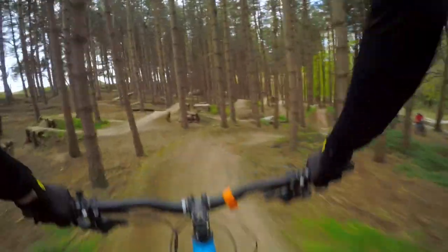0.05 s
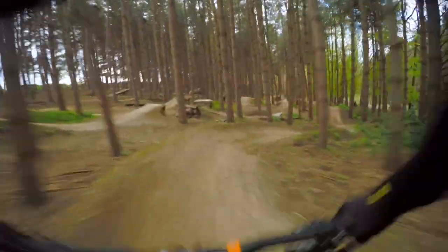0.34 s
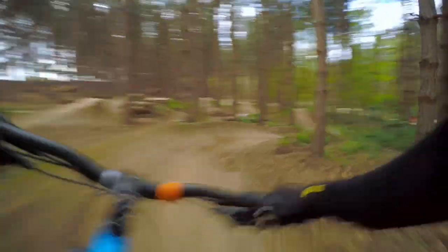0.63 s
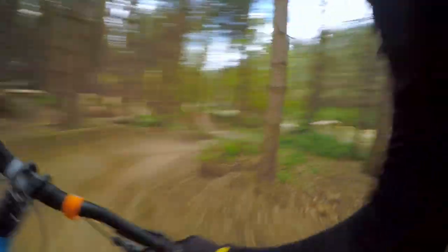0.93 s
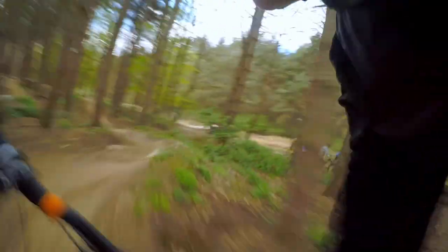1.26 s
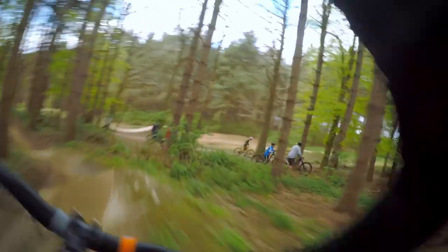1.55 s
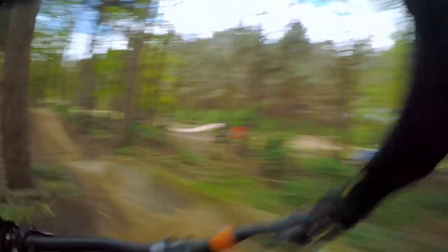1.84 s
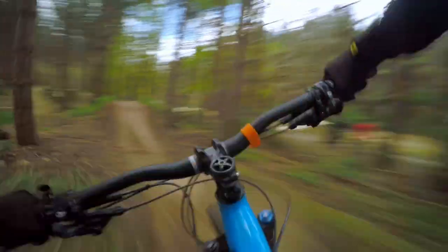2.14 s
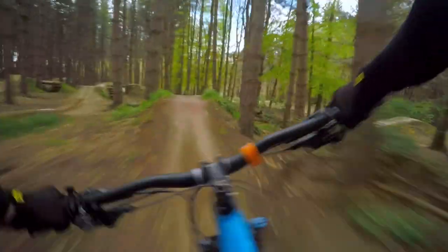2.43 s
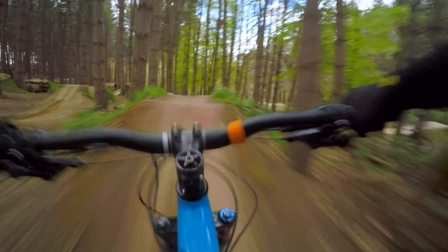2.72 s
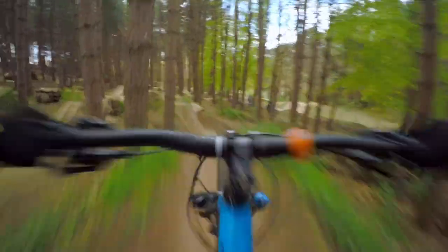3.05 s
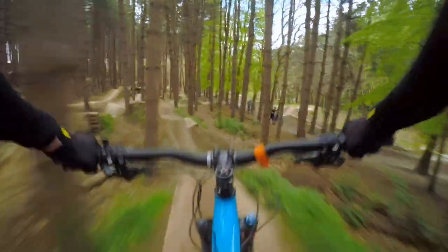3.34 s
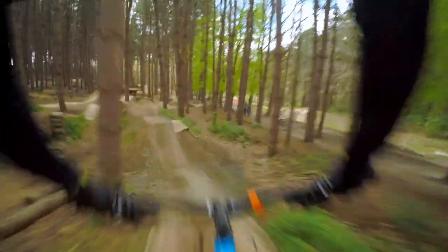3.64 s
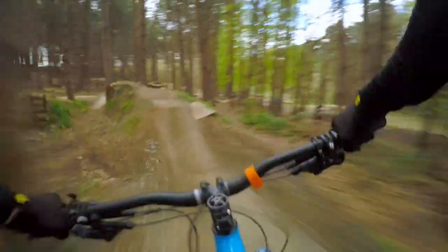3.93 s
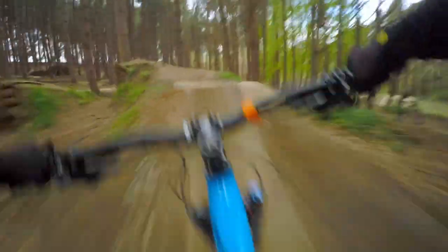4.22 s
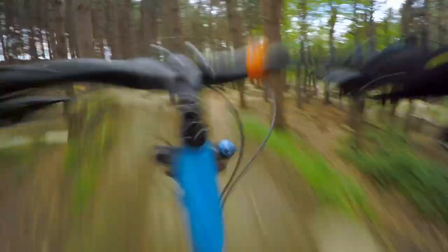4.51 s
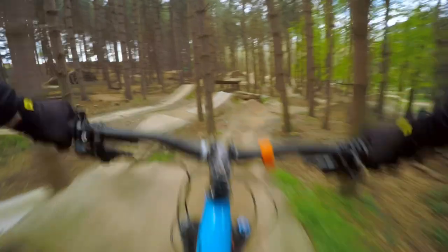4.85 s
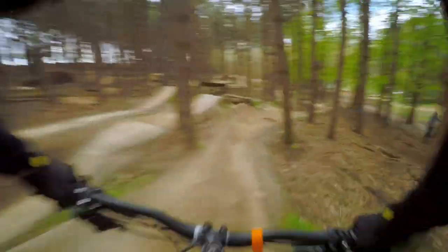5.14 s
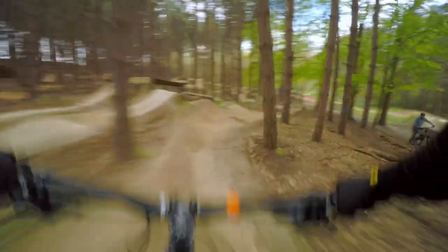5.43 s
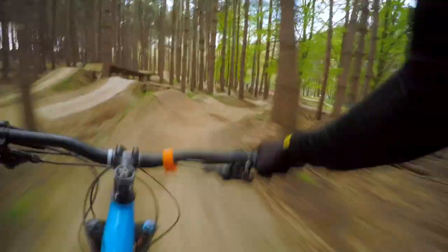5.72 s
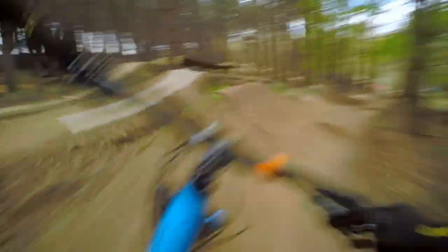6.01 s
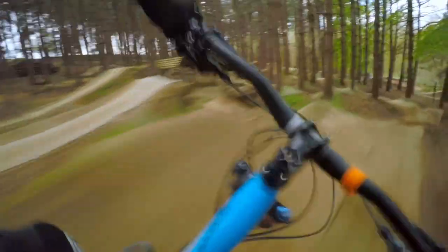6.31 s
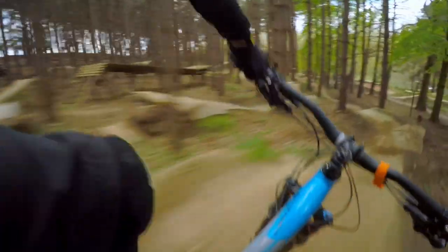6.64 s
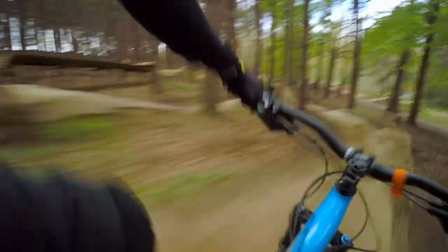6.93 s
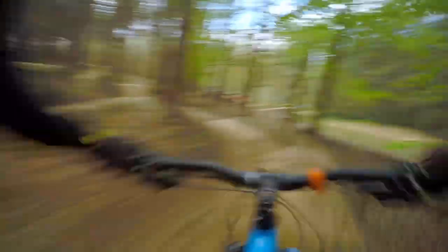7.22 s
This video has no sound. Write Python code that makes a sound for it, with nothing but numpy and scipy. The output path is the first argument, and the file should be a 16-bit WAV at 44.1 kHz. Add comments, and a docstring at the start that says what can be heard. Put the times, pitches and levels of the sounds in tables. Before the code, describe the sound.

Low wind rumbles and thumps on a chest-worn microphone as a mountain bike speeds along a woodland dirt trail. Gritty tyre crunch and hum drop away at each jump, where the freewheel ticks faintly, then return with a jolt on landing. Stones snap against the frame, the chain clatters and metal occasionally pings. Midway the rear tyre skids amid hard knocks, before more jumps and stronger gusts.

```python
"""Mountain bike on a dirt jump trail

Heard from the rider's chest in a wood, the tyres crunch and hum while they touch the ground, skid
once and flick stones at the frame. Landings and jolts excite the damped modes of chain and frame.
In the air the tyre sounds die away, leaving the ticking freewheel and a thin hiss.
Turbulent wind buffets the microphone throughout."""
import sys
import numpy as np
from scipy import signal
from scipy.fft import rfft, irfft, next_fast_len
from scipy.io import wavfile
from scipy.ndimage import uniform_filter1d, map_coordinates

SR = 44100
rng = np.random.default_rng(int(sys.argv[2]) if len(sys.argv) > 2 else 0)


def inscribe(sig):
    """Save sig as 16-bit PCM at rate SR to the path in sys.argv[1].

    A 1-D sig is mono; a 2-D sig holds one channel per row.
    Samples are clipped to [-1, 1] before scaling.
    """
    pcm = np.round(np.clip(np.atleast_2d(sig).T, -1, 1) * 32767)
    wavfile.write(sys.argv[1], SR, pcm.astype(np.int16))


N = 320607
TIME = np.arange(N) / SR
CUTOFF_HZ = 15300


def from_db(db):
    """Amplitude ratio of a level in decibels."""
    return 10 ** (np.asarray(db) / 20)


def rms_one(x):
    """Normalisation to unit rms."""
    return x / np.sqrt(np.mean(x ** 2) + 1e-20)


def in_time(rows):
    """Linear interpolation of (time [s], value) rows at every sample."""
    return np.interp(TIME, *np.transpose(rows))


def swells(rows):
    """Sum of Gaussian envelopes, given as (time [s], level [dB], half length [s])."""
    return sum(from_db(db) * np.exp(-((TIME - s) / half) ** 2) for s, db, half in rows)


def decay(t, t60):
    """Exponential damping: the amplitude falls 60 dB in t60 seconds."""
    return np.exp(-np.log(1000) * t / t60)


def add(track, s, sound):
    """Superposition of a short sound on a track at time s."""
    start = max(int(s * SR), 0)
    track[start:start + len(sound)] += sound[:max(N - start, 0)]


def drift(per_s):
    """Smooth random modulation through per_s values a second; rms 1."""
    knots = rng.standard_normal(N // 20)
    return rms_one(map_coordinates(knots, [TIME * per_s + 10], order=2))


def rough_tone(phase, width_hz):
    """Narrow-band noise: two carriers in quadrature, each randomly modulated."""
    return drift(width_hz) * np.cos(phase) + drift(width_hz) * np.sin(phase)


def coloured(x, spectrum):
    """Minimum-phase filtering by a (frequency [Hz], level [dB]) curve; rms 1."""
    size = next_fast_len(N + SR, real=True)
    hz, db = np.transpose(spectrum)
    log_f = np.log(np.arange(size // 2 + 1) * SR / size + 1)
    edges = np.log(np.r_[hz[0] / 2, hz, hz[-1] * 2])
    response_db = np.interp(log_f, edges, np.r_[db[0] - 20, db, db[-1] - 20])
    cepstrum = irfft(np.log(from_db(response_db)), size)
    cepstrum[1:size // 2] *= 2   # folding the cepstrum makes the filter causal
    cepstrum[size // 2 + 1:] = 0
    return rms_one(irfft(rfft(x, size) * np.exp(rfft(cepstrum)), size)[:N])


def noise(spectrum, envelope=1):
    """Source and filter: white noise under an envelope, shaped by a spectrum; rms 1."""
    return coloured(rng.standard_normal(N) * envelope, spectrum)


def steadied(x, span_s):
    """Division by the running rms: slow power changes go, faster fluctuations stay."""
    size = max(int(span_s * SR), 2)
    return x / np.sqrt(uniform_filter1d(uniform_filter1d(x * x, size), size) + 1e-9)


# wind strength, growing with speed: (time [s], relative level [dB])
WIND_STRENGTH = [(0, 0), (.05, 5), (.22, -5.5), (.39, 3), (.44, -9), (.6, -4.5), (.74, 3), (1.05, 0),
                 (1.3, -5), (1.95, -1), (2.35, 1), (3.0, -1.5), (3.9, -1), (4.1, 1.5), (5.7, 0), (6.6, 2),
                 (7.27, 2)]
# gusts: (time [s], roar level [dB], half length [s])
GUSTS = [(.08, -28, 0.06), (.79, -21.5, 0.11), (2.625, -10.5, 0.031), (2.78, -21, 0.075),
         (3.18, -22, 0.057), (4.05, -27.5, 0.035), (4.63, -17.5, .07), (4.87, -22.5, 0.094),
         (5.23, -25, 0.064), (5.9, -18, 0.07), (6.14, -21, .04), (6.29, -20.5, 0.064), (6.5, -19.5, 0.031),
         (6.7, -17.5, 0.03), (7.0, -18.5, 0.031)]
# spectra of the eddies, the roar and a gust's thump: (frequency [Hz], relative level [dB])
EDDY_SPECTRUM = [(8, -20.5), (18, 5.5), (30, 2), (50, 0.5), (80, -9), (130, -23), (300, -56.5)]
ROAR_SPECTRUM = [(45, -14.5), (90, 0), (130, -3.5), (200, -10.5), (300, -17.5), (500, -27.5), (1000, -42),
                 (3000, -64.5)]
THUMP_SPECTRUM = [(30, -19), (55, 3.5), (75, 3), (110, -1), (170, -36), (600, -64)]

def wind(flutter_db, lumpy_db):
    """Turbulent pressure: large eddies buffet the microphone; gusts add a thump and fluttering roar."""
    flow = from_db(in_time(WIND_STRENGTH) + lumpy_db * drift(20))
    gusts = swells(GUSTS)
    eddies = steadied(noise(EDDY_SPECTRUM), 0.085)
    roar = steadied(noise(ROAR_SPECTRUM, from_db(flutter_db * drift(60))), 0.07)
    thump = steadied(noise(THUMP_SPECTRUM), 0.05)
    roar_gain = np.hypot(from_db(-29.5) * flow, gusts)
    return from_db(-16) * flow * eddies + roar_gain * roar + from_db(1.5) * gusts * thump


# spectrum of a pawl click: (frequency [Hz], relative level [dB])
PAWL_SPECTRUM = [(1200, 0), (2800, 10), (4200, -4), (6500, 1.5), (9000, -8), (14500, -4)]

def freewheel(clicks_per_s, decay_s):
    """Periodic impacts: the pawls drop over each tooth of the hub."""
    since_click = TIME % (1 / clicks_per_s)
    clicks = np.exp(-since_click / decay_s) * from_db(1.8 * drift(45))
    return from_db(-50.5) * noise(PAWL_SPECTRUM, clicks)


# hiss of the air: (time [s], level [dB])
HISS_LEVEL = [(0, -48), (3.4, -43), (4.9, -46), (7.27, -44)]
# its spectrum: (frequency [Hz], relative level [dB])
HISS_SPECTRUM = [(300, 10), (600, 6), (1100, -1.5), (1900, -4), (2300, -2.5), (2750, 3.5), (3300, -1),
                 (4200, -0.5), (5200, -8.5), (6800, -10), (9000, -13.5), (15000, -18.5)]

def air_hiss():
    """Flow noise: air streams past the spokes."""
    return from_db(in_time(HISS_LEVEL)) * noise(HISS_SPECTRUM)


# short tyre growls and hums: (time [s], pitch [Hz], level [dB], half length [s])
BRIEF_HUMS = [(0.243, 556, -49, 0.034), (2.838, 420, -37, 0.061), (2.929, 409.6, -27, 0.015),
              (2.999, 458, -32.5, 0.018), (3.144, 610, -40, 0.031)]

def brief_hums():
    """Random phase modulation: short tyre growls and hums waver, pitched above the tread hum."""
    return sum(np.sqrt(2) * swells([(s, db, half)]) * np.sin(2 * np.pi * hz * TIME + 0.5 * drift(33))
               for s, hz, db, half in BRIEF_HUMS)


# knocks of chain and frame: (time [s], relative level [dB], centre frequency [Hz])
KNOCKS = [(0.317, -25, 1520), (0.364, -17, 2900), (1.815, -25, 2105), (1.854, -23, 3490),
          (1.916, -26.5, 1470), (2.11, -14.5, 1580), (2.129, -20, 2410), (2.163, -23.5, 1670),
          (2.281, -20, 1060), (2.672, -15, 3460), (3.03, -22, 1600), (3.461, -28, 1360), (3.531, -24, 880),
          (3.731, -19, 1480), (3.878, -26, 2220), (4.012, -15.5, 1580), (4.136, -11.5, 1704),
          (4.195, -7.5, 2560), (4.213, -15, 3000), (4.251, -10.5, 2150), (5.151, -26.5, 3770),
          (5.328, -25.5, 2520), (5.370, -26, 2980), (5.388, -17.5, 1643), (5.905, -19, 1260),
          (6.041, -13.5, 2880), (6.358, -17, 1310), (6.829, -16.5, 1800), (6.865, -16.5, 2500),
          (6.903, -16.5, 2750), (6.955, -20.5, 1315), (7.223, -16, 1570)]

def knocks(level_db, log_spread, rattle, mode_count, t60):
    """Impact excitation: a cluster of damped modes, and a rattle that dies with them."""
    out, t = np.zeros(N), TIME[:SR // 6]
    for s, db, hz in KNOCKS:
        detune, phase = rng.random((2, mode_count, 1))
        offset = 2 * (np.arange(mode_count)[:, None] + detune) / mode_count - 1   # -1 to 1
        mode_hz = hz * np.exp(log_spread * offset)
        modes = np.cos(offset * np.pi / 2) * np.sin(2 * np.pi * (mode_hz * t + phase))
        band = signal.butter(2, [hz / 2, min(hz * 2, CUTOFF_HZ)], "band", fs=SR, output="sos")
        chatter = signal.sosfilt(band, rng.standard_normal(len(t)))
        clack = rms_one(rms_one(modes.sum(0)) + rattle * rms_one(chatter))
        add(out, s, from_db(db + level_db) * clack * decay(t, t60))
    return out


# wheel and frame resonances: (frequency [Hz], bandwidth [Hz], gain [dB])
FRAME_MODES = [(790, 25, -4.5), (1210, 37, -9), (1670, 80, -9.5), (1940, 51, -25), (2750, 190, -13.5),
               (3220, 330, -25)]

def frame(shaking):
    """Forced vibration: wheels and frame add their resonances to whatever shakes them."""
    out = shaking
    for hz, width_hz, db in FRAME_MODES:
        r = np.exp(-np.pi * width_hz / SR)
        poles = [1, -2 * r * np.cos(2 * np.pi * hz / SR), r * r]
        out = out + from_db(db) * (1 - r * r) / 2 * signal.lfilter([1, 0, -1], poles, shaking)
    return out


# tyre bite, one curve per stretch from touchdown to lift: (time [s], level re ordinary rolling [dB])
BITE = [
    [(0.319, -0.5), (0.41, 2.5), (0.6, 0), (1.15, -2), (1.3, 3), (1.5, -2.5), (1.78, -15)],
    [(1.82, -7), (2.05, -3), (2.25, -1.5), (2.5, -6.5), (2.7, 1.5), (3.03, -5), (3.11, -13), (3.24, -14)],
    [(3.735, -0.5), (3.8, 2.5), (3.87, -10), (3.99, -6.5), (4.035, 2.5), (4.245, 17.5), (4.32, 7.5),
     (4.46, -0.5), (4.82, -11)],
    [(5.27, -10.5), (5.36, -8), (5.39, 0.5), (5.58, 3.5), (5.88, -2.5), (6.08, 4), (6.27, 0.5), (6.37, 4),
     (6.72, -16.5)],
    [(6.83, 3.5), (6.92, 3.5), (7.04, -0.5), (7.11, 4.5), (7.2, 0), (7.27, 6.5)],
]

def contact(touch_s, lift_s):
    """Contact loading: the bite's gain ramps up at touchdown and decays as the wheels lift."""
    bite = 0
    for stretch in BITE:
        touchdown, lift = stretch[0][0], stretch[-1][0]
        onset = np.clip((TIME - touchdown) / touch_s + 1, 0, 1)
        release = np.exp(-np.maximum(TIME - lift, 0) / lift_s)
        bite = bite + onset * release * from_db(in_time(stretch))
    return bite


def landings(decay_s):
    """Impact transients: a decaying jolt at each touchdown, as strong as the first bite."""
    touchdowns = [stretch[0] for stretch in BITE]
    return sum(from_db(db) * (TIME >= s) * np.exp(-np.abs(TIME - s) / decay_s) for s, db in touchdowns)


def fractures(per_s, spread_db, decay_s):
    """Shot noise: the power of random fractures, each sudden and dying quickly; mean 1."""
    sizes = from_db(spread_db * np.minimum(rng.exponential(1, N), 5))
    impulses = (rng.random(N) < per_s / SR) * sizes ** 2
    power = signal.lfilter([1], [1, -np.exp(-1 / (decay_s * SR))], impulses + 1e-12)
    return power / power.mean()


def crushed_dirt(per_s, spread_db, decay_s, clod_share, patchy_db):
    """Granular fracture: clods break across all bands at once, single grains each in one band."""
    out, clods = 0, fractures(per_s, spread_db, decay_s)
    edges_hz = np.geomspace(350, 17000, 11)
    for low, high in zip(edges_hz, edges_hz[1:]):
        band = signal.butter(2, [low, high], "band", fs=SR, output="sos")
        hiss = signal.sosfilt(band, rng.standard_normal(N))
        power = clod_share * clods + (1 - clod_share) * fractures(per_s, spread_db, decay_s)
        out = out + hiss * np.sqrt(power) * from_db(patchy_db * drift(25))
    return out


def pebbles(per_s, spread_db, cycles, pitches):
    """Free vibration: pebbles squeezed from under the tread ring, falling 60 dB in `cycles`; rms 1."""
    sizes = from_db(spread_db * np.minimum(rng.exponential(1, N), 3)) * rng.choice([-1, 1], N)
    clicks = sizes * (rng.random(N) < per_s / SR)
    out, pitch_index = 0, rng.integers(0, pitches, N)
    for k, hz in enumerate(np.geomspace(1150, 4800, pitches)):
        w, r = 2 * np.pi * hz / SR, decay(1 / SR, cycles / hz)
        strikes = clicks * (pitch_index == k) + 1e-18
        out = out + signal.lfilter([0, np.sin(w)], [1, -2 * r * np.cos(w), r * r], strikes)
    return rms_one(out)


# sliding of the rear tyre: (time [s], skid share of the crossfade [0-1])
SLIDE = [(4.0, 0.01), (4.14, 0.85), (4.3, 0.8), (4.45, 0), (4.6, 0.3)]
# spectra of dirt under a rolling and a sliding tyre: (frequency [Hz], relative level [dB])
ROLL_SPECTRUM = [(500, -28.5), (800, -1), (1020, 0), (1300, 1.5), (1550, -1), (2200, -0.5), (3500, -1),
                 (4200, -2.5), (5000, -10.5), (6800, -16.5), (10000, -40)]
SKID_SPECTRUM = [(500, -32), (1000, -18), (1400, 1.5), (1800, -0.5), (2000, 2.5), (2330, -3.5),
                 (2800, -1.5), (3600, -1), (4600, -9.5), (6500, -16.5), (10000, -30)]

def crunch(bite):
    """Crushing and friction: dirt breaks finely under a rolling tread, coarsely under a sliding one."""
    fine = crushed_dirt(per_s=740, spread_db=2, decay_s=0.00083, clod_share=0.76, patchy_db=2.5)
    coarse = crushed_dirt(per_s=250, spread_db=3, decay_s=0.00098, clod_share=0.45, patchy_db=4)
    pops = from_db(-6.5) * pebbles(per_s=240, spread_db=0.5, cycles=78, pitches=24)
    rolling = from_db(-33.8) * (steadied(coloured(fine, ROLL_SPECTRUM), 0.1) + pops)
    sliding = from_db(-37) * steadied(coloured(coarse, SKID_SPECTRUM), 0.05)
    slide = in_time(SLIDE)
    return bite * (np.sqrt(1 - slide) * rolling + np.sqrt(slide) * sliding)


# sprays of loose dirt: (time [s], level [dB], half length [s])
SPRAYS = [(2.75, -46, .04), (3.03, -41.5, 0.019), (3.22, -45.5, .05), (4.57, -44, 0.11)]
# spectrum of flying grit: (frequency [Hz], relative level [dB])
GRIT_SPECTRUM = [(3000, -35), (5000, 7.5), (6600, 3), (8900, -1.5), (10800, -4), (12200, -5.5), (13100, -5),
                 (14200, -8), (15500, -17)]

def grit_spray(grip, jolt):
    """Many tiny impacts merge into a hiss: grit thrown up by rolling, landings and sprays."""
    grit = crushed_dirt(per_s=990, spread_db=4, decay_s=0.001, clod_share=0.19, patchy_db=3.5)
    gain = np.hypot(from_db(-47.5) * grip ** 0.56, from_db(-42) * jolt + swells(SPRAYS))
    return from_db(1) * gain * steadied(coloured(grit, GRIT_SPECTRUM), 0.086)


# response of the tyre casing: (frequency [Hz], relative level [dB])
CASING_SPECTRUM = [(180, -7.5), (330, -1), (430, 1), (520, -4), (620, -2.5), (750, -10), (1100, -15.5),
                   (2000, -29.5)]

def casing_boom(grip, jolt):
    """Random excitation: the casing booms as it rolls and thumps when a landing squashes it."""
    gain = np.hypot(from_db(-36.5) * grip ** 0.88, from_db(-35.5) * jolt)
    return from_db(2.5) * gain * steadied(noise(CASING_SPECTRUM), 0.11)


# tread hum, following the wheel speed: (time [s], pitch [Hz])
TREAD_PITCH = [(.32, 282), (.55, 322), (.75, 298.8), (1.25, 288), (1.5, 316), (1.7, 282), (2.0, 308),
               (2.2, 282), (2.35, 296), (2.6, 272), (3.0, 325), (3.75, 285), (4.25, 298), (5.85, 286),
               (6.3, 298), (6.9, 277), (7.27, 295)]
# added hum as the bike presses into a dip or bank: (time [s], level [dB], half length [s])
PRESSES = [(1.38, -28.5, 0.12), (2.28, -23.5, .05), (4.22, -31, 0.071), (4.42, -20.5, 0.042),
           (4.84, -30.5, 0.039), (6.97, -27, 0.053)]

def tread_hum(grip, width_hz, core_hz, core_share):
    """Quasi-periodic impacts: knobs drum on uneven ground, a rough tone with a steadier core."""
    phase = 2 * np.pi * np.cumsum(in_time(TREAD_PITCH)) / SR
    rough = np.sqrt(1 - core_share) * rough_tone(phase, width_hz)
    core = np.sqrt(core_share) * rough_tone(phase, core_hz)
    gain = np.hypot(from_db(-31.5) * grip ** 0.76, swells(PRESSES))
    return gain * steadied(rough + core, 0.067)


def tyres(bite, grip_limit_db):
    """Friction saturates: above the grip limit the tyre slides and only the crunch keeps growing."""
    grip = bite / np.hypot(1, bite / from_db(grip_limit_db))
    jolt = landings(decay_s=0.13)
    return (crunch(bite) + grit_spray(grip, jolt) + casing_boom(grip, jolt)
            + tread_hum(grip, width_hz=115, core_hz=44.96, core_share=0.34))


def crackle(envelope, spectrum):
    """Source and filter: random signs under an envelope ring through a body, keeping their power."""
    return np.sqrt(np.mean(envelope ** 2)) * coloured(envelope * rng.choice([-1, 1], N), spectrum)


def small_stones(bite, per_s, scatter_db):
    """Poisson process: rows as in LARGE_STONES while the tyres are down, louder with the bite."""
    at = np.flatnonzero((rng.random(N) < per_s / SR) & (bite > 0.1))
    db = 20 * np.log10(bite[at]) * 0.56 + scatter_db * rng.standard_normal(len(at))
    return list(zip(at / SR, -26.5 + db, -37.5 + db))


# stones flicked at the bike: (time [s], relative snap level [dB], relative top level [dB])
LARGE_STONES = [(0.4035, -21, -41), (0.918, -26, -31.5), (1.0962, -28, -23), (1.2913, -26, -28),
                (1.918, -29, -35), (1.9956, -25.5, -49), (2.1148, -20.5, -34), (2.1645, -24, -50),
                (2.23, -24.5, -40), (2.7383, -21, -37), (2.8291, -17.5, -27), (2.9317, -26, -31),
                (2.9865, -30, -30), (3.0125, -24, -36), (3.7567, -22, -29), (3.7644, -13.5, -35),
                (4.146, -14, -28), (4.2945, -18, -37), (5.422, -29, -28), (5.5026, -22, -24),
                (5.5558, -20, -21), (5.6451, -22.5, -24.5), (5.95, -29, -33), (6.0724, -23, -27),
                (6.1454, -22, -22.5), (6.8634, -17.5, -29), (6.9544, -17, -28), (7.051, -22, -33),
                (7.1328, -17, -44), (7.228, -17, -21.5), (7.253, -15.5, -23)]
# spectra of the snap and its bright top: (frequency [Hz], relative level [dB])
SNAP_SPECTRUM = [(1200, -14), (3000, -2.5), (4600, -0.5), (6200, -1.5), (7800, -5.5), (9000, -15),
                 (12000, -37)]
TOP_SPECTRUM = [(7000, -8), (9000, -4), (9900, 1), (11800, -2), (13200, -9), (15500, -14)]

def stones(bite, snap_gain_db, top_gain_db, t60, bounce, bounce_s):
    """Impact and rebound: each stone snaps on metal and bounces once; sharp edges add a bright top."""
    snap, top, t = np.zeros(N), np.zeros(N), TIME[:SR // 15]
    for s, snap_db, top_db in LARGE_STONES + small_stones(bite, per_s=3.4, scatter_db=6.5):
        since_bounce = t - bounce_s * rng.uniform(0.5, 1.5)
        blow = decay(t, t60) + bounce * (since_bounce > 0) * decay(np.abs(since_bounce), t60)
        add(snap, s, from_db(snap_db + snap_gain_db) * blow)
        add(top, s, from_db(top_db + top_gain_db) * blow)
    return crackle(snap, SNAP_SPECTRUM) + crackle(top, TOP_SPECTRUM)


# light scuffs between the hard contacts: (time [s], level [dB], half length [s])
SCUFFS = [(1.271, -25.5, 0.0069), (5.041, -29, 0.0095), (5.136, -31.5, 0.01), (5.199, -40, 0.043),
          (5.28, -38, 0.014)]
# their spectrum: (frequency [Hz], relative level [dB])
SCUFF_SPECTRUM = [(400, 9.5), (900, 2), (1800, -1.5), (3000, -0.5), (4000, 2.5), (5200, -17), (8000, -41)]

def scuffs():
    """Friction noise: soft, short scrapes swell and fade."""
    return swells(SCUFFS) * noise(SCUFF_SPECTRUM)


# hard jolts that ring a metal part: (time [s], level [dB])
PINGS = [(1.854, -35.5), (2.668, -30), (6.04, -40.5)]
# its modes: (frequency [Hz], relative level [dB], 60 dB decay time [s])
METAL_MODES = [(2680, -3, 0.24), (3800, -3.5, 0.39), (3875, -5, .3), (5010, -10, 0.38)]

def pings():
    """Modal ringing: a metal part vibrates freely after a jolt."""
    out, t = np.zeros(N), TIME[:SR // 2]
    ring = sum(from_db(db) * decay(t, t60) * np.sin(2 * np.pi * hz * t) for hz, db, t60 in METAL_MODES)
    for s, db in PINGS:
        add(out, s, from_db(db) * ring)
    return out


# a faint whirr as the bike rolls on: (time [s], level [dB], half length [s])
WHIRR = [(5.72, -43.5, 0.18)]

def whirr(hz, width_hz):
    """Narrow-band noise, heard as a thin, high whirr that comes and goes."""
    return swells(WHIRR) * rough_tone(2 * np.pi * hz * TIME, width_hz)


def scene():
    """Superposition of bike and wind in one channel; tyres and knocks sound through the frame."""
    bite = contact(touch_s=0.003, lift_s=0.02715)
    shaking = tyres(bite, grip_limit_db=10)
    shaking += knocks(level_db=-4.5, log_spread=0.7, rattle=0.49, mode_count=9, t60=0.052)
    bike = from_db(-0.95) * frame(shaking) + pings()
    bike += stones(bite, snap_gain_db=-3, top_gain_db=-4.5, t60=0.015, bounce=0.15, bounce_s=0.0056)
    bike += scuffs() + whirr(hz=3400, width_hz=300) + brief_hums()
    bike += freewheel(clicks_per_s=55, decay_s=0.0025) + air_hiss()
    return (bike + wind(flutter_db=3.5, lumpy_db=1.5))[None]


def record(dry):
    """Soft saturation rounds the loudest peaks; a steep low-pass filter cuts the highest treble."""
    rounded = dry / (1 + (dry / 0.92) ** 6) ** (1 / 6)
    return signal.sosfilt(signal.ellip(12, 0.1, 90, CUTOFF_HZ, fs=SR, output="sos"), rounded)


dry = scene()
out = record(dry)
inscribe(out)
```